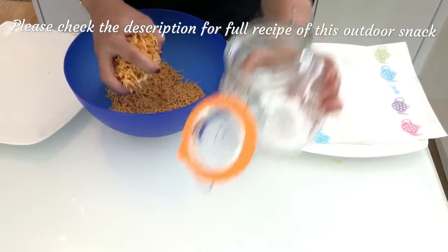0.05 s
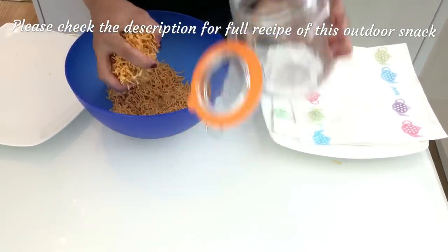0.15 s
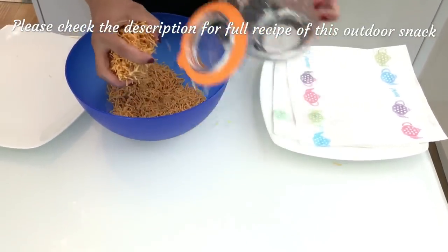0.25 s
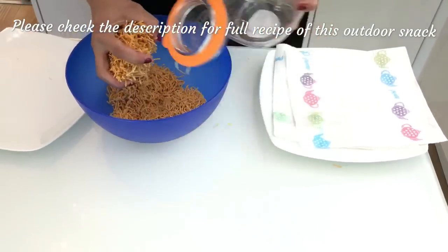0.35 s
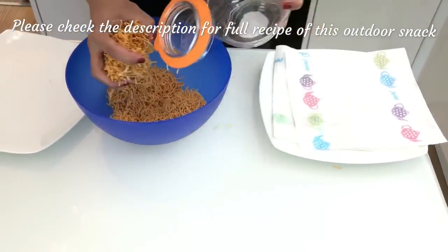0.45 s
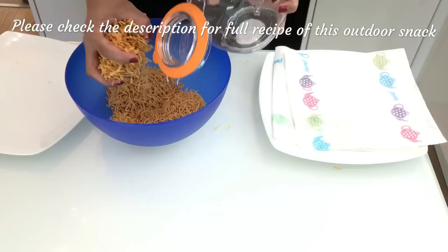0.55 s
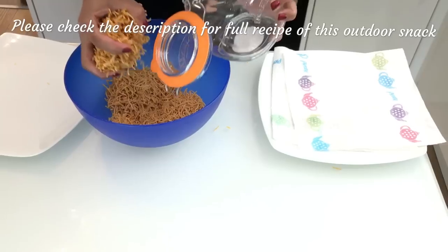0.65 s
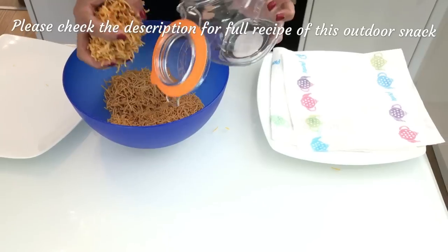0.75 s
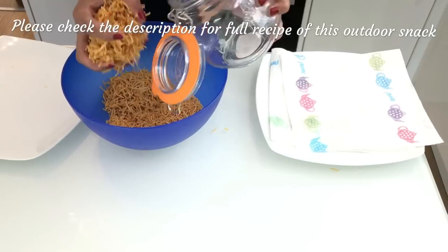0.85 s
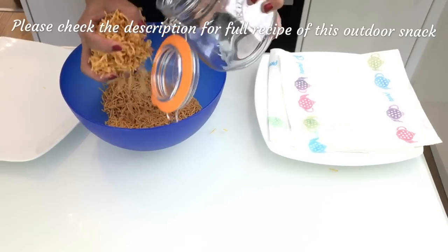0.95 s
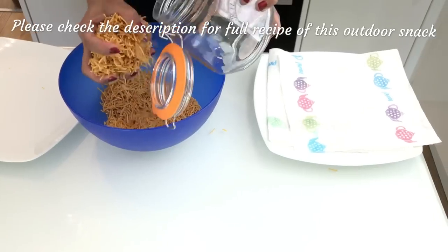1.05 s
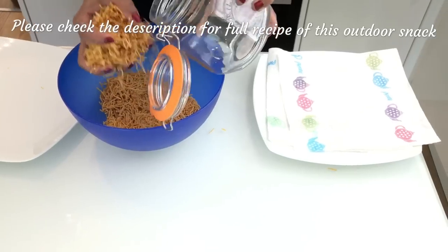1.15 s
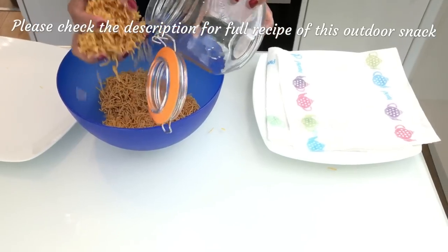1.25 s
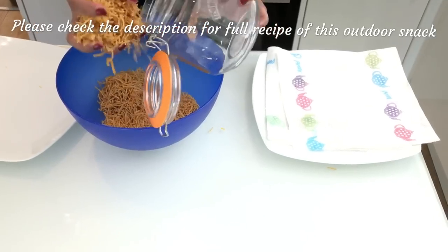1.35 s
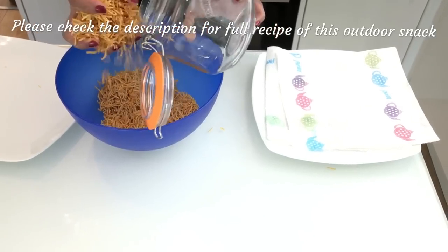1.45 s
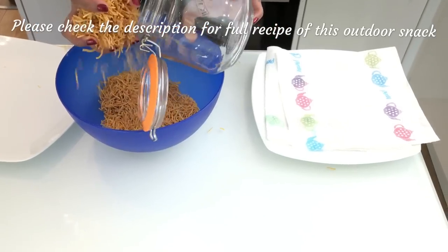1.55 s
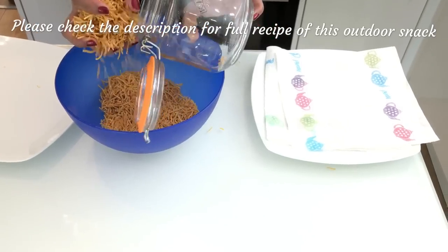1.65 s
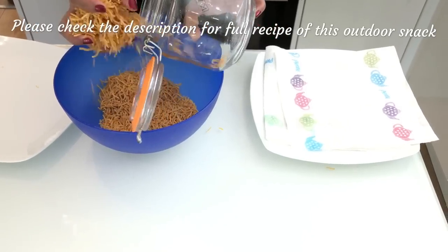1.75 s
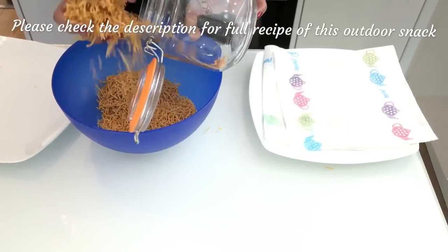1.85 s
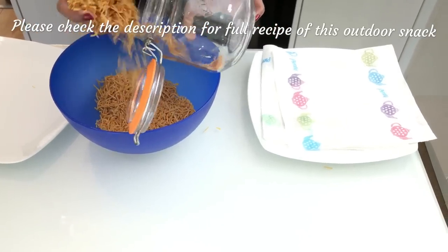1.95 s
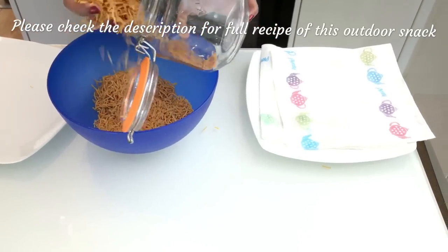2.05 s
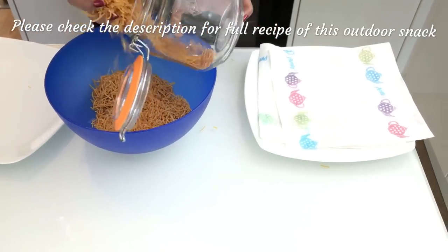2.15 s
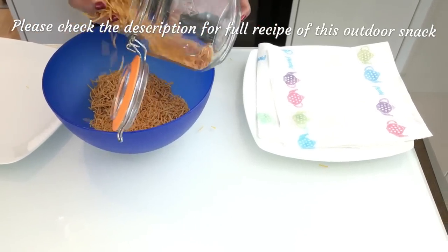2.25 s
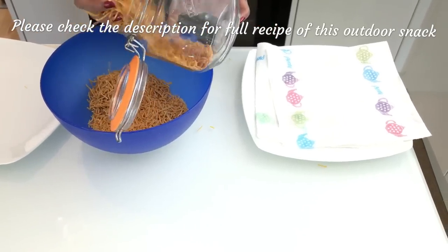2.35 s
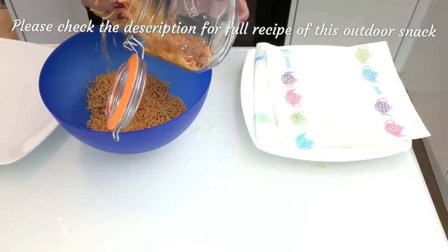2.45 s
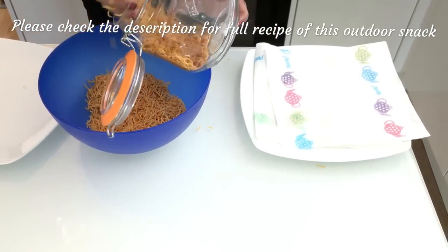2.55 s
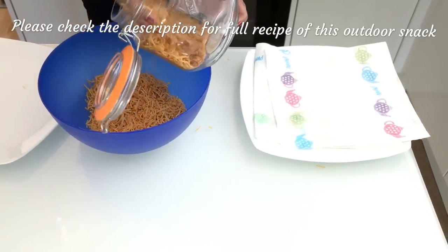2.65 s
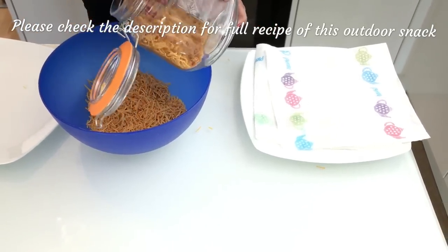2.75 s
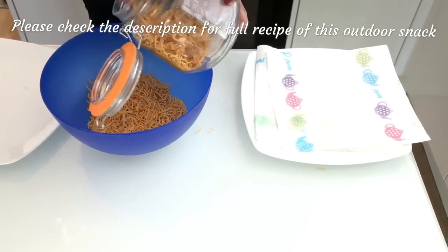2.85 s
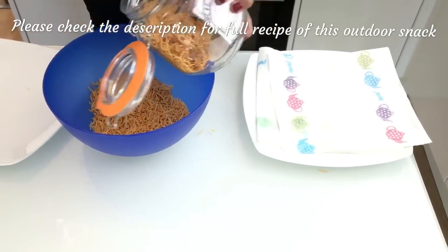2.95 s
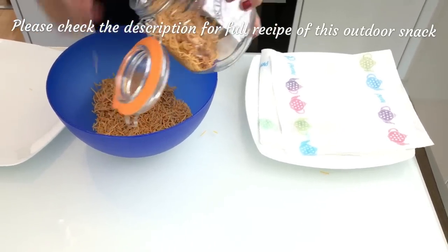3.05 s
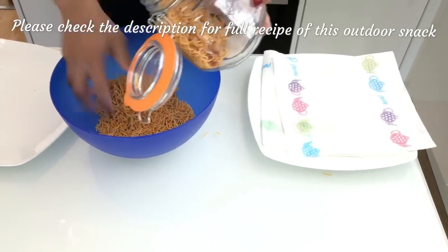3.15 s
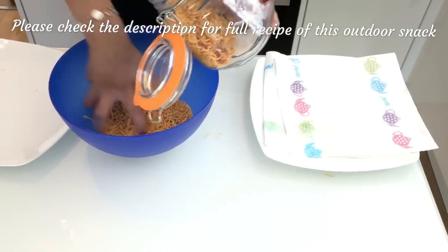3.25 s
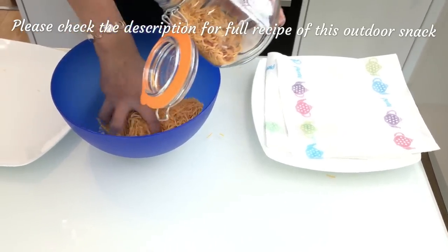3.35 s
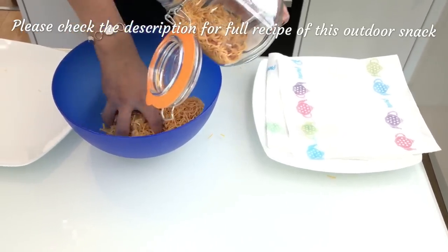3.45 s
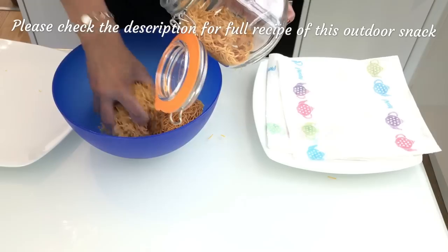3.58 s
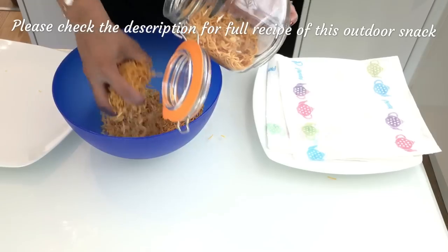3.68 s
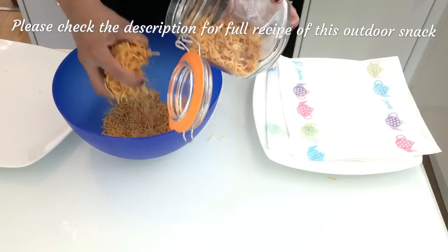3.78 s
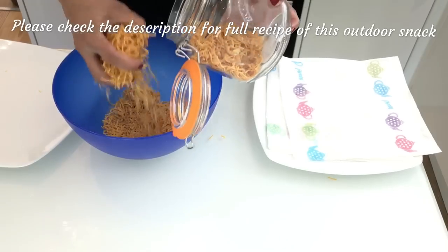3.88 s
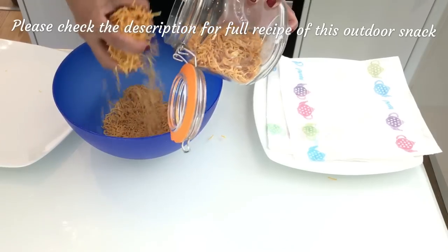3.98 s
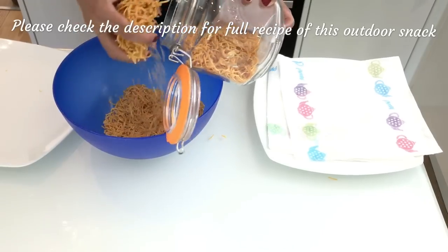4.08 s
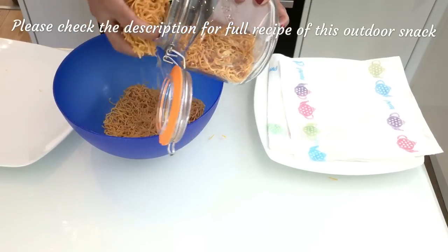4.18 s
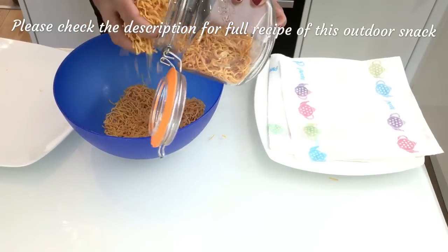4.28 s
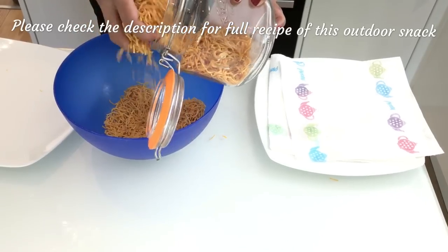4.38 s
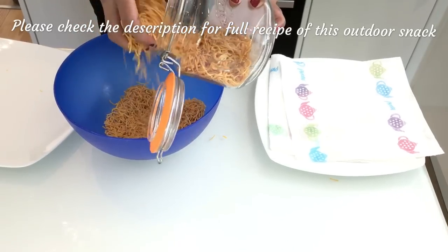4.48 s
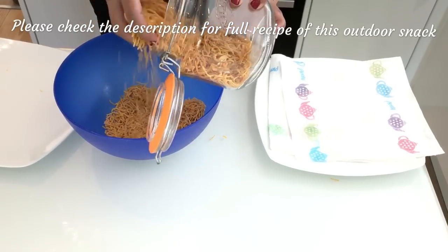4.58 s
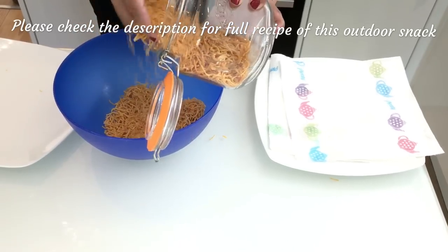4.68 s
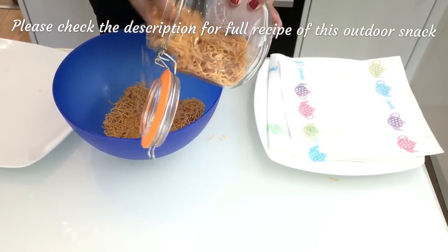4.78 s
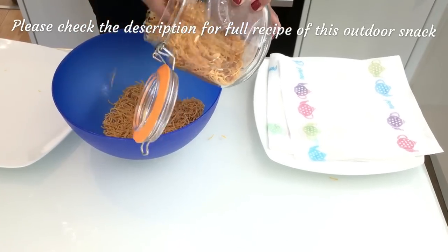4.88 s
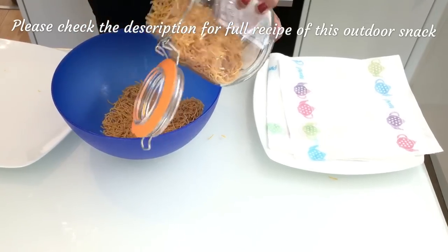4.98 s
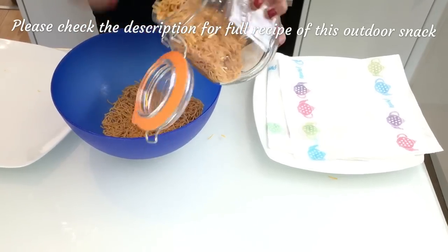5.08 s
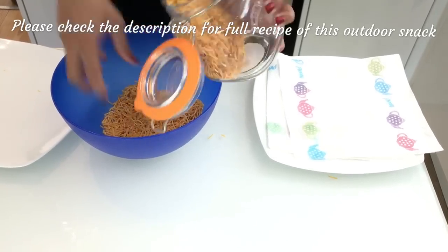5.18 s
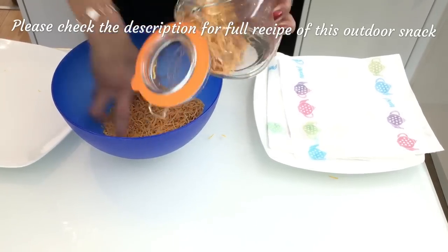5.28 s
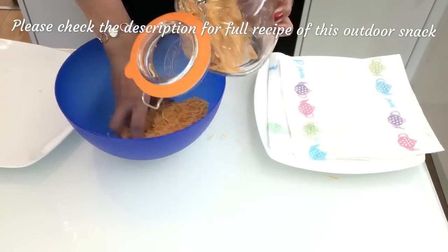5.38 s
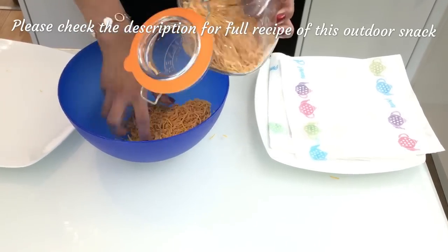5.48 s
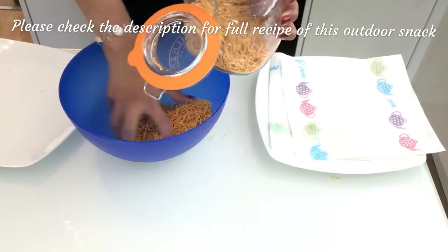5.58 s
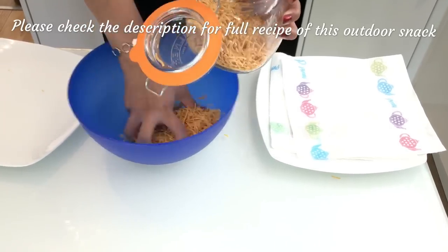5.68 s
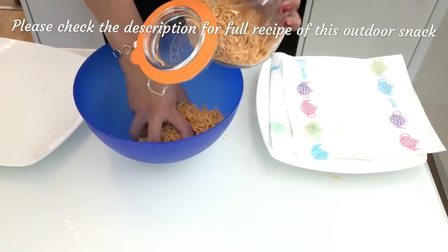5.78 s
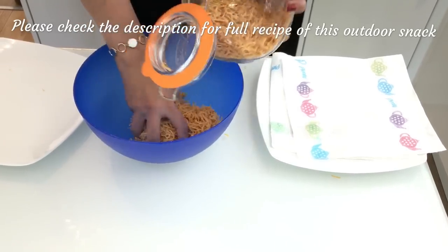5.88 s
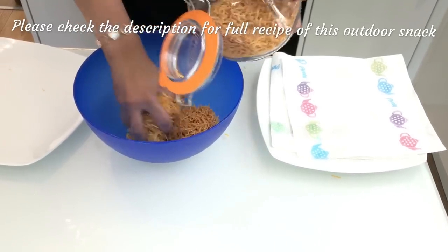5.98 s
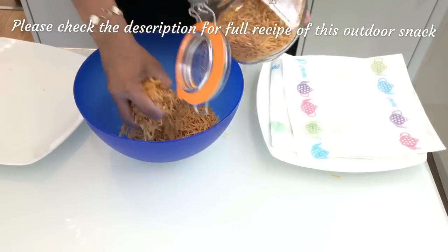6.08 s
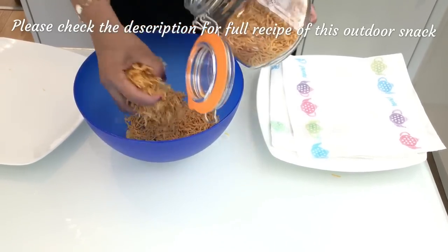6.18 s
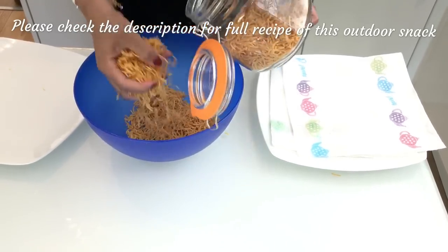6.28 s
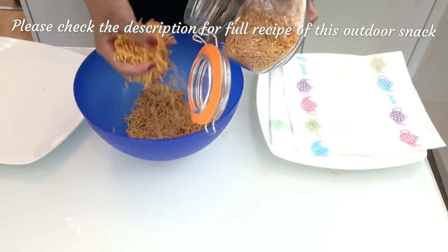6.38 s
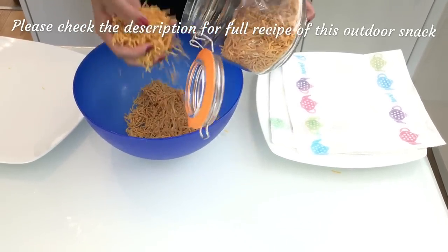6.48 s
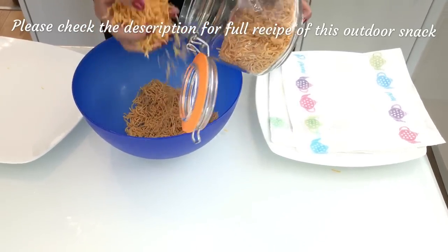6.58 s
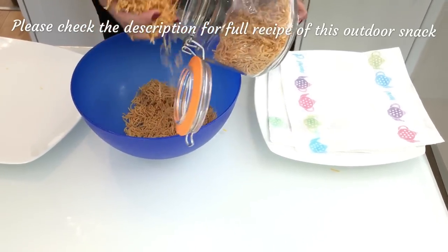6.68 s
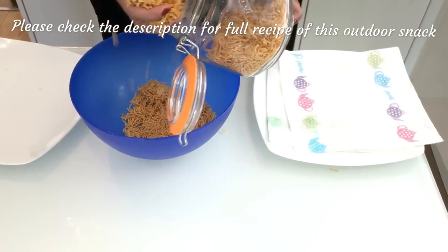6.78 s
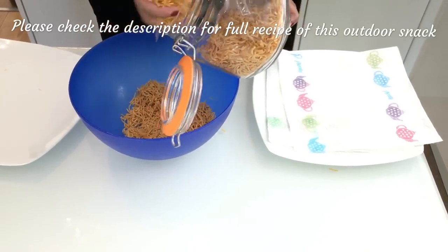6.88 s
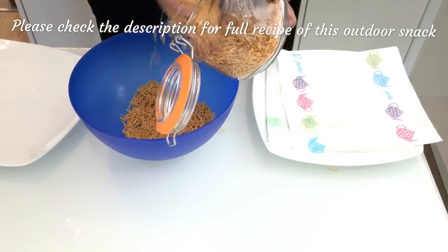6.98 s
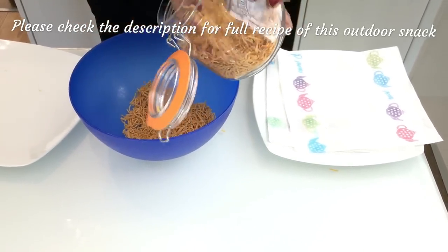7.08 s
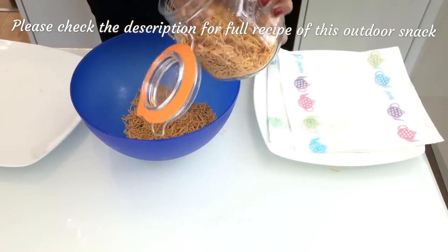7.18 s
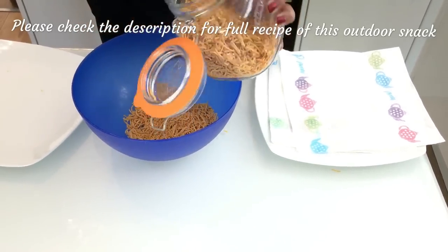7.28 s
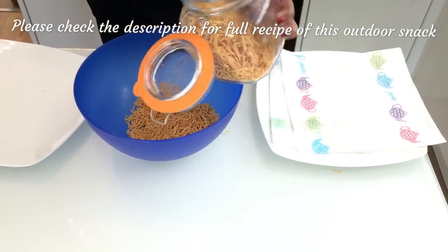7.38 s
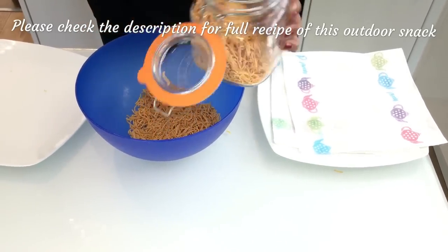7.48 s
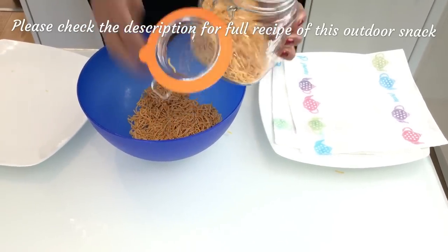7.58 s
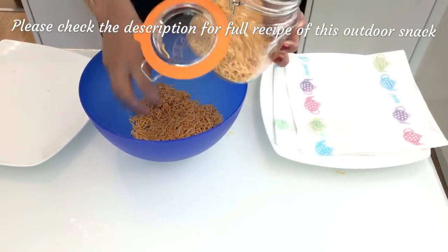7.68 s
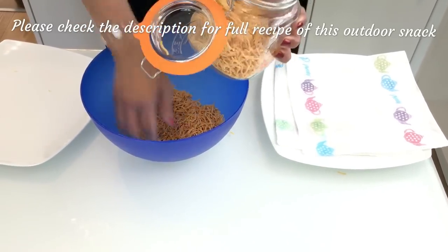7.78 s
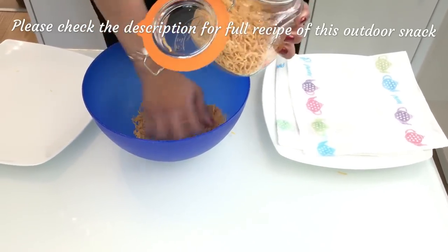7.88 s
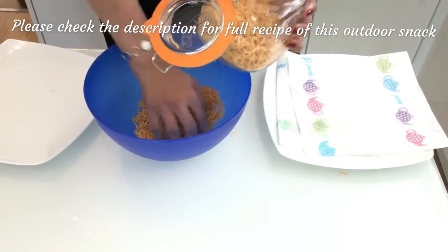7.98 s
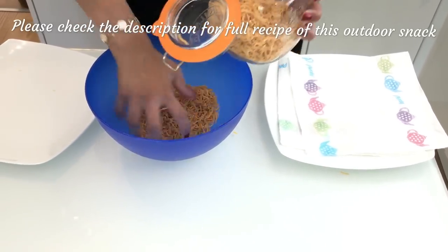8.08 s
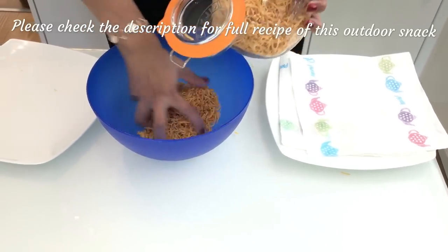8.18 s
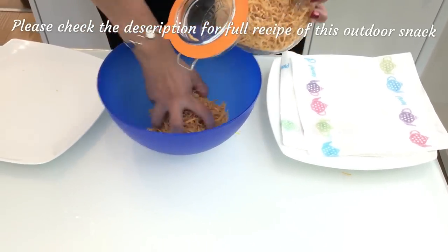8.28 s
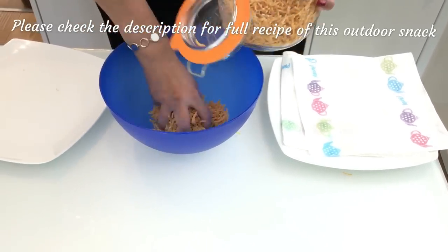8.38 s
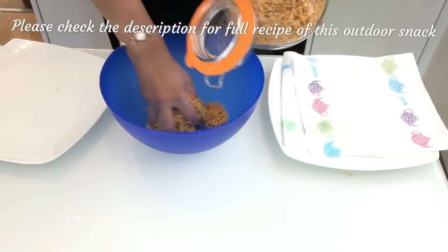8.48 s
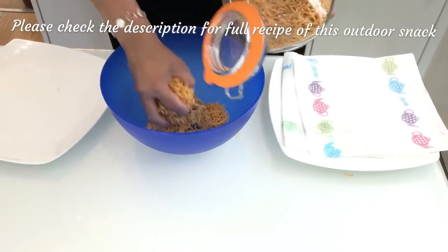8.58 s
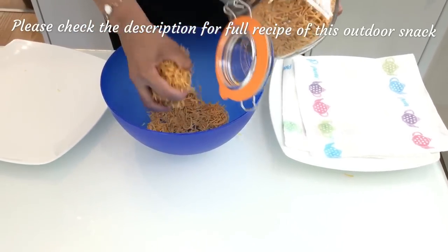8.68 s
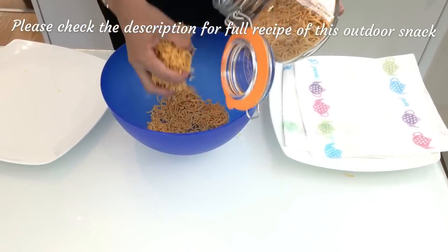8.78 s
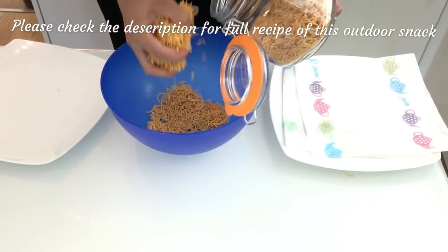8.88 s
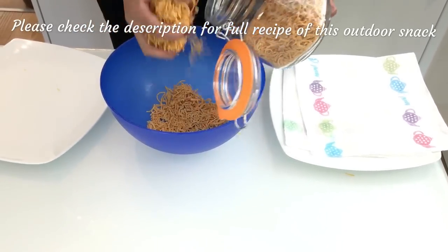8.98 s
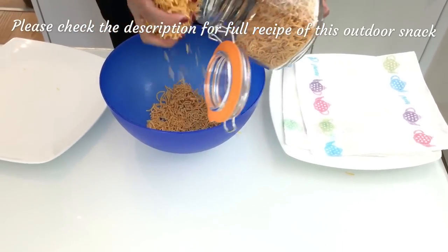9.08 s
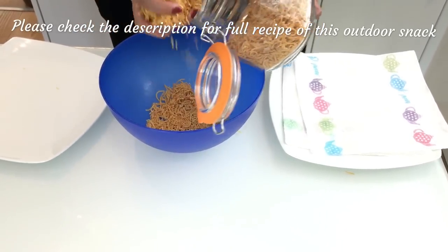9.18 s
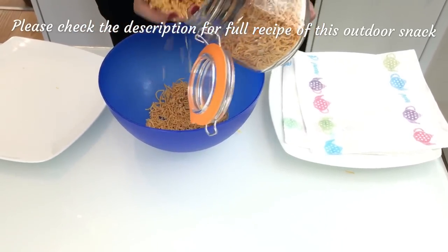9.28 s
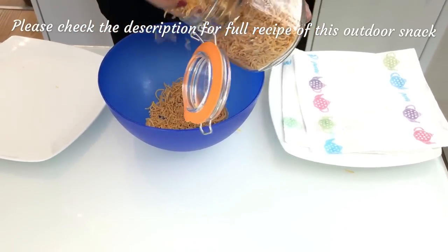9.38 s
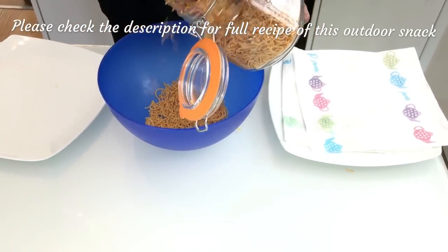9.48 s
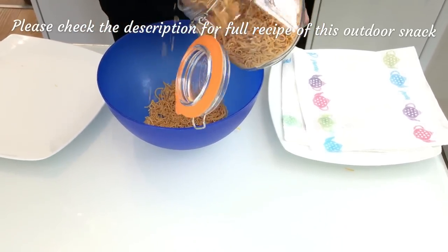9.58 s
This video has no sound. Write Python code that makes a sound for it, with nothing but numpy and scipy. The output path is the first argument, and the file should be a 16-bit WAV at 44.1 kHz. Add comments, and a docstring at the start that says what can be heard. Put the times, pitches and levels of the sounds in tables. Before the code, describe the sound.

Close and dry: light crackling of crisp strands, then a burst of hard snaps and glassy skittering. Three rounds of scooping from a plastic bowl follow, a swelling deep crunch with hollow knocks, then crackly trickling and ticking into a jar. The jar shifts with a dull ring before the last scoop. A fridge hums faintly in the small reflective kitchen.

```python
"""In a small hard kitchen a fridge hums steadily; one microphone stands close, and both channels carry it.
From the start brittle fried strands fall from a hand: random cracks rustle and drum on a plastic bowl.
Larger pieces soon snap, as struck resonances with splinters, and strands make a glass jar's modes tinkle.
Then come knocks on the bowl, and digs into the heap that swell the rustle with a deep crunch.
Near 7.7 s the jar shifts with a broader, duller ring; its last slide rings bright. The room adds a short tail."""
import sys
import numpy as np
from scipy import signal
from scipy.fft import rfft, irfft
from scipy.io import wavfile
from scipy.ndimage import uniform_filter1d

SR = 44100
rng = np.random.default_rng(int(sys.argv[2]) if len(sys.argv) > 2 else 0)


def bounce(signal):
    """Save signal as a 16-bit WAV file at the path given by the first command-line argument."""
    frames = np.transpose(np.atleast_2d(signal))
    limited = np.clip(frames, -1, 1)
    pcm = np.round(limited * 32767).astype(np.int16)
    wavfile.write(sys.argv[1], SR, pcm)


N = 425124
T = np.arange(N) / SR  # seconds

# Resonances of the plastic bowl: (frequency [Hz], width [Hz], level [dB])
BOWL_MODES = [(161, 16, -4), (241, 59, -10.5), (348, 28, 1.5), (517, 32, -7), (591.7, 39, 6.5),
              (656, 18, -1), (740, 30, -2.5), (1080, 200, -13.5)]


def undb(db):
    """Decibels to gain."""
    return 10 ** (np.asarray(db) / 20)


def unit(x):
    """Scale to rms 1."""
    return x / np.sqrt(np.mean(x ** 2))


def peaked(x, db):
    """Scale so that the highest peak has this level."""
    return x * undb(db) / np.max(np.abs(x))


def level_curve(points):
    """Gain along straight lines between (time [s], level [dB]) points; -120 dB outside them."""
    return undb(np.interp(T, *np.transpose(points), left=-120, right=-120))


def wander(size):
    """Slow chance, smoothed twice over this many samples; rms 1."""
    smooth = uniform_filter1d(rng.standard_normal(N), size=size)
    return unit(uniform_filter1d(smooth, size=size))


def band(x, lo_hz, hi_hz):
    """Band-pass."""
    return signal.sosfilt(signal.butter(2, [lo_hz, hi_hz], "band", fs=SR, output="sos"), x)


def ring(x, hz, width):
    """One resonance, gain 1 at its centre."""
    return signal.lfilter(*signal.iirpeak(hz, hz / width, fs=SR), x)


def body(x, modes):
    """A struck object: the sum of its resonances, neighbours in opposite phase."""
    return sum((-1) ** k * undb(db) * ring(x, hz, width) for k, (hz, width, db) in enumerate(modes))


def colour(x, points):
    """Causal filter with the given spectrum, built from the cepstrum of the log gain."""
    hz, db = np.transpose(points)
    grid_hz = np.linspace(1, SR / 2, num=2049)
    log_gain = np.interp(np.log(grid_hz), np.log(hz), db) * np.log(10) / 20
    cepstrum = irfft(log_gain)
    # Folding the second half onto the first gives minimum phase.
    cepstrum[1:2048] *= 2
    cepstrum[2049:] = 0
    return signal.oaconvolve(x, irfft(np.exp(rfft(cepstrum))))[:N]


def cracks(rate, spread_db, length_s):
    """Random short crackles, rate a second, many small and few large; mean power about 1 at any rate."""
    share = np.clip(rate / SR, 0, 1)
    chance = rng.random((2, N))
    size = undb(spread_db * np.minimum(-np.log(1 - chance[1]), 4))
    power = (chance[0] < share) * size ** 2 / (share * np.mean(size ** 2))
    fade = np.exp(-1 / (length_s * SR))
    envelope = np.sqrt(signal.lfilter([1 - fade], [1, -fade], power))
    return envelope * rng.standard_normal(N)


def blows(count, length_s, splinters):
    """Sudden pushes that fray into uneven noise, one row each."""
    t = np.arange(SR // 8) / SR
    noise = rng.standard_normal((count, 2, len(t)))
    noise[:, 0, 0] = 3  # every push starts with a firm edge
    uneven = uniform_filter1d(noise[:, 1], size=150, axis=1) ** 2 * 150
    return noise[:, 0] * (np.exp(-t / length_s) + splinters * uneven * np.exp(-t / 0.018))


def kitchen():
    """Fridge tones, sines that waver together in level, over quiet room noise."""
    # Fridge tones before the waver: (frequency [Hz], level [dB])
    fridge_tones = [(100.2, -61.5), (114.4, -71), (44.1, -73.5)]
    # Shape of the room noise: (frequency [Hz], relative density [dB per Hz])
    air_shape = [(30, -49), (50, -14), (140, -19.5), (260, -15.5), (400, -19), (650, -21), (1300, -27),
                 (4000, -32.5), (15000, -39)]
    air_db, waver_db = -63.5, 1.3
    hum = sum(np.sqrt(2) * undb(db) * np.sin(2 * np.pi * hz * T) for hz, db in fridge_tones)
    hum *= undb(waver_db * wander(size=4000))
    return hum + undb(air_db) * unit(colour(rng.standard_normal(N), air_shape))


def falling_power():
    """Power of the rustle and of the crisp edge as strands fall from the hand."""
    # One list for each stretch of falling strands:
    # (time [s], rustle level [dB], crisp edge against the rustle [dB])
    stretches = [
        [(0.0, -55.5, -9), (0.364, -64, -2), (0.678, -53, -7), (0.854, -59.5, -4), (1.05, -63.5, 6)],
        [(1.06, -54, -3), (1.12, -58.5, 3), (1.26, -48.5, -5), (1.46, -53.5, -1.5), (1.66, -49.5, -2),
         (1.79, -51, -0.5), (2.1, -51, 3.5), (2.38, -53, -5.5), (2.74, -61.5, 4.5), (2.95, -70, 0),
         (3.1, -99, -13)],
        [(3.45, -38, -11), (3.866, -46, -8), (4.14, -46.5, -5), (4.284, -49, -3), (4.36, -58.5, 0),
         (4.444, -53.5, 5.5), (4.58, -54.5, 5), (4.614, -44.5, -2), (4.752, -44.5, -10), (4.856, -47, -2.5),
         (5.068, -57, -7), (5.3, -71, 5)],
        [(5.5, -48.5, 0), (5.576, -49, -10), (5.71, -46.5, -23), (5.836, -44, -15), (5.938, -41.5, -8.5),
         (6.51, -51, -4.5), (6.852, -48, -1.5), (7.086, -54, -1.5), (7.226, -60.5, 2.5), (7.45, -73, -21)],
        [(7.5, -69, -3), (7.672, -72, 7), (7.78, -80, -12), (7.95, -60, -12)],
        [(8.15, -46, -17), (8.394, -44, -9), (8.668, -40.5, -13.5), (8.872, -48.5, -27), (9.12, -58, 1),
         (9.27, -45, -12.5), (9.64, -55.5, -0.5)],
    ]
    fall, crisp = np.zeros(N), np.zeros(N)
    for s, db, edge_db in map(np.transpose, stretches):
        gain = level_curve(list(zip(s, db)))
        fall += gain ** 2
        crisp += (gain * undb(np.interp(T, s, edge_db))) ** 2
    return fall, crisp


def heap():
    """Strands crack against each other, the more the harder they are stirred; thick ones crack lower."""
    # Shape of the rustle: (frequency [Hz], relative density [dB per Hz])
    rustle_shape = [(410, -21), (700, -21), (816, -31), (1180, -2.5), (1520, -4), (1720, 4), (2170, 7),
                    (2950, 1), (5380, -3), (8000, -5.5), (10400, -6), (17600, -120)]
    # Shape of the crisp edge: (frequency [Hz], relative density [dB per Hz])
    edge_shape = [(2940, 7.5), (5000, -83), (5380, -48), (7750, 4.5), (8710, 11), (10300, 7), (14200, 10.5),
                  (16000, 2.5)]
    # Loose strands of three sizes: pitch [Hz]
    strand_pitches = [1700, 2300, 2800]
    fall_drum_db, fall_deep_db, tick_db = -9.5, -17.5, -10.5  # against the rustle of falling strands
    dig_edge_db = -8.5  # against the rustle of a dig
    thud_db = -16  # against the deep crunch
    deep_lag_s = 0.024  # the fingers reach the bottom after the loudest rustle
    light_hz = 396  # falling strands are too light to move the bowl below this
    bowl_wander_db = 2  # each mode swells and fades alone as the strands move

    fall, crisp = falling_power()
    dig, deep = dig_power(), dig_power(deep_lag_s, deep=1)
    rustle = np.sqrt(dig + fall)
    rate = 150 + 200 * (rustle / undb(-54.5)) ** 1.1  # cracks a second
    thick, middle, thin, fine = (cracks(rate, spread_db=6.5, length_s=0.0035) for _ in range(4))

    sizes = sum(ring(cracks(rate / 3, spread_db=3.5, length_s=0.0025), hz, 510) for hz in strand_pitches)
    tinted = 0.79 * sizes + ring(thin, 3800, 5700) + ring(fine, 6130, 4500)
    tinted += 0.063 * (thick + middle + thin)
    out = rustle * unit(colour(tinted, rustle_shape))

    # The same cracks drum on the bowl.
    drum = sum(undb(bowl_wander_db * wander(size=2500)) * body(thick + middle, [mode])
               for mode in BOWL_MODES)
    light_drum = band(band(drum, light_hz, 3700), light_hz, 3700)
    out += np.sqrt(dig_power(on_bowl=1)) * unit(drum)
    out += np.sqrt(fall) * undb(fall_drum_db) * unit(light_drum)

    crunch = np.sqrt(deep + fall * undb(2 * fall_deep_db))
    out += crunch * unit(band(thick, 847, 1287))
    # The pressed bowl thuds on the counter.
    out += np.sqrt(deep) * undb(thud_db) * unit(ring(thick, 130, 59))

    # Lone falling pieces tick.
    ticks = cracks(np.full(N, 70.), spread_db=4, length_s=0.0008)
    tick_sound = ring(ticks, 2500, 980) + 0.91 * band(ticks, 6900, 22000)
    out += np.sqrt(fall) * undb(tick_db) * unit(tick_sound)

    dust = 0.86 * rng.standard_normal(N)  # crumbs too small to tell apart
    edge = np.sqrt(dig * undb(2 * dig_edge_db) + crisp)
    return out + edge * unit(colour(thin + fine + dust, edge_shape))


def snaps():
    """Each larger piece rings briefly on its own pitch under a bright click and scatters splinters."""
    # Single snaps before trims: (time [s], peak level [dB], pitch [Hz], brightness against the peak [dB])
    pieces = [(0.1206, -39, 2450, -13), (0.173, -37.5, 2380, -6.5), (0.348, -32.5, 2400, -10),
              (0.4327, -37, 2300, -12), (0.5895, -47, 2030, 3), (0.606, -29.5, 2400, -8),
              (0.6894, -30, 2680, -9.5), (0.7037, -31, 2380, -18), (1.0797, -32, 2520, -13),
              (1.1174, -30.5, 2400, -16), (1.1492, -29, 1680, -17), (1.1983, -28, 2560, -15),
              (1.2481, -37, 2430, -15), (1.2785, -20.5, 2340, -23), (1.2856, -14, 2350, -17),
              (1.3268, -14, 2400, -10.5), (1.3774, -28, 2160, -11), (1.399, -29, 2570, -7),
              (1.6265, -6.5, 2480, -23), (1.6881, -22.5, 2490, -5.5), (1.732, -26, 2540, -7),
              (1.803, -36.5, 2500, -10), (1.8314, -20, 2600, -8.5), (1.88, -26.5, 2400, -12),
              (2.0057, -25, 2430, -1.5), (2.029, -27, 6000, -12), (2.0383, -19, 2520, -7.5),
              (2.043, -24.5, 2450, -9), (2.209, -25.5, 2360, -12), (2.219, -34, 7500, -6),
              (2.2384, -24, 2440, -9), (2.267, -26.5, 2440, -6), (2.4187, -20.5, 2400, -12),
              (2.722, -32, 2550, -18), (2.7342, -21, 2200, -15), (3.195, -31, 2700, -15),
              (3.2259, -23, 2150, -8), (3.253, -19, 2310, -8), (3.2974, -22.5, 1700, -22),
              (3.7298, -22, 2450, -9.5), (3.8221, -23.5, 2380, -12), (3.907, -37, 2330, -17),
              (3.9415, -40, 2030, -13), (3.9559, -30, 2110, -27), (4.0023, -23.5, 2040, -11),
              (4.0457, -43, 2310, -18), (4.0693, -27.5, 2180, 0), (4.0991, -21.5, 2280, -14),
              (4.153, -30, 2500, -8), (4.1722, -27, 2550, -8), (4.2153, -30, 2300, -18),
              (4.234, -28.5, 2130, -11), (4.2741, -30.5, 3020, -4), (4.514, -30.5, 2300, -5),
              (4.601, -31, 2320, -6), (4.613, -18, 2260, -14), (4.6263, -28, 2330, -7.5),
              (4.668, -23, 2100, -7), (4.675, -25, 2450, -19), (4.737, -34, 1810, -15),
              (4.7631, -27, 2310, -33), (4.8367, -31, 1760, -7), (4.8555, -32.5, 2950, -4),
              (4.8927, -23, 2180, -12), (5.01, -25, 2100, -4), (5.029, -25, 2560, -12),
              (5.329, -25.5, 2330, -17), (5.351, -20.5, 2340, -19), (5.5873, -34.5, 4460, -5),
              (5.6067, -28.5, 2420, -22), (5.6988, -20.5, 1800, -17), (6.098, -33, 2310, -21),
              (6.1313, -20.5, 2410, -20), (6.2029, -13.5, 2390, -22), (6.283, -24, 2650, -12),
              (6.3395, -29, 2260, -6), (6.3688, -29.5, 2600, -7), (6.4362, -32, 2010, -16),
              (6.4507, -24, 2510, -12), (6.4857, -26, 2360, -16), (6.5313, -32.5, 2520, -6),
              (6.59, -27.5, 2330, -27), (6.6093, -28, 2520, -20), (6.633, -25, 2300, -21),
              (6.647, -19.5, 2880, -9.5), (6.6814, -29, 2380, 1), (6.699, -12, 2480, -19),
              (6.729, -32, 2260, -6), (6.772, -25.5, 3500, -9), (6.795, -25, 2440, -26),
              (6.8207, -28, 2720, -3), (6.841, -33, 2490, 1), (6.8698, -27, 2480, -6),
              (6.919, -23.5, 4630, -17), (6.945, -20, 2460, -12), (6.991, -18.5, 2200, -11),
              (7.0898, -27, 2370, -29), (7.202, -35, 1900, -8), (7.8395, -25.5, 2260, -30),
              (7.8514, -29, 2430, -27), (7.8829, -29.5, 2510, -25), (8.1749, -14.5, 2430, -16),
              (8.269, -22, 1740, -28), (8.3166, -17, 1870, -13), (8.351, -15, 1680, -14),
              (8.5903, -24, 2400, -23), (8.6108, -16.5, 2280, -17), (8.7081, -25, 2330, -16),
              (8.726, -20.5, 2480, -5.5), (8.734, -24.5, 2330, -10), (8.7952, -26.5, 3520, -11),
              (8.8199, -24, 2220, -15), (9.031, -39.5, 5000, 1), (9.0702, -32, 1890, -20),
              (9.074, -34, 2190, -14), (9.0959, -27, 2530, -2), (9.1176, -26, 2010, -24),
              (9.1739, -24.5, 2130, -22), (9.192, -29, 1200, -19), (9.239, -21, 2600, -3.5),
              (9.2508, -27, 2560, -18), (9.2755, -31, 2350, -5), (9.3154, -29, 2340, -21),
              (9.355, -30, 1800, -16), (9.4153, -22, 2300, -13.5), (9.4378, -26.5, 2160, -2.5),
              (9.5768, -29.5, 2330, -5)]
    sharp_db, crisp_db = 5.5, 10  # upper middle and top, against the brightness
    base_width_hz, base_hz = 650, 2460  # pieces pitched above base_hz ring much more briefly
    out = np.zeros(N + SR)
    for (s, db, hz, bright_db), push in zip(pieces, blows(len(pieces), 0.00098, 0.16)):
        width = min(base_width_hz * max(hz / base_hz, 1) ** 2, hz)
        pitched = ring(ring(push, hz, width), hz, width)
        sound = peaked(pitched + 0.45 * band(push, 1960, 4130), db - 0.5)
        sound += peaked(band(push, 3400, 6620), db + bright_db + sharp_db)
        sound += peaked(band(push, 14000, 22000), db + bright_db + crisp_db)
        out[int(s * SR):][:len(push)] += sound
    return out[:N]


def jar():
    """Strands skitter over the glass and keep its modes ringing, each in its own time."""
    # Strands sliding on glass, a list a slide, before the trim: (time [s], level [dB])
    slides = [
        [(0.622, -75), (0.632, -45.5), (0.665, -56), (0.7, -66)],
        [(1.95, -76), (2.12, -57), (2.27, -47), (2.38, -53), (2.47, -48.5), (2.676, -56), (2.81, -48),
         (2.9, -62), (2.98, -78), (3.05, -96)],
        [(4.93, -68), (5.06, -52), (5.135, -61), (5.18, -57.5), (5.27, -59.5), (5.33, -55)],
        [(6.9, -75), (6.99, -52), (7.2, -62.5), (7.31, -78)],
        [(7.53, -73), (7.622, -63), (7.634, -47), (7.66, -59), (7.68, -72)],
        [(9.45, -49.5), (9.622, -59), (9.64, -43)],
    ]
    # Resonances of the glass: (frequency [Hz], width [Hz], level [dB])
    glass_modes = [(2390, 99, -8), (3960, 80, -3.5), (4547, 58, 1.5), (6450, 200, -11), (7230, 200, -8.5),
                   (8420, 100, -6), (9800, 140, -15), (11600, 220, -17)]
    # Strands shifting in the nearly full jar, before the trim: (time [s], level [dB])
    shift = [(7.672, -66), (7.684, -50), (7.714, -49.5), (7.84, -59)]
    # Broader, duller resonances of that shift: (frequency [Hz], width [Hz], level [dB])
    shift_modes = [(3940, 240, 2), (6550, 800, -5), (7400, 300, -5), (8500, 550, -7), (12500, 2000, -11)]
    # Extra level of the glass modes above 8 kHz: (time [s], level [dB])
    shrill_points = [(2.6, 2.5), (2.72, -8), (7.3, -12), (7.6, 3.5)]
    glass_wander_db = 2  # each mode swells and fades alone as the strands move
    shrill = undb(np.interp(T, *np.transpose(shrill_points)))
    out = np.zeros(N)
    for spans, modes, trim_db in ((slides, glass_modes, 2), ([shift], shift_modes, 1.5)):
        slide = sum(level_curve(points) for points in spans)
        taps = cracks(np.full(N, 1200.), spread_db=1.5, length_s=0.0019)
        scale = undb(trim_db) / np.std(body(taps, modes))
        for mode in modes:
            touch = slide * undb(glass_wander_db * wander(size=2500))
            if modes is glass_modes and mode[0] > 8000:
                touch = touch * shrill
            out += scale * body(touch * taps, [mode])
    return out


def knocks():
    """Fingers and lumps knock on the bowl: its modes ring, with a hard rap and a low thud."""
    # Before trims: (time [s], peak level [dB], hard rap against the peak [dB], low thud against it [dB])
    hits = [(1.153, -34, 1.5, -5.5), (1.286, -42.5, -13, -27), (1.627, -40.5, -19, -18),
            (1.986, -42, 11.5, -0.5), (3.256, -38.5, -2, -3), (3.296, -35, 10, -12), (3.327, -32, -7, -13),
            (4.106, -43.5, 8, -9), (4.599, -39.5, 5, -29), (5.331, -38.5, -1, -12), (5.698, -42, 1, -6),
            (5.727, -30.5, -3, -22), (5.839, -45, 1, -2), (5.862, -44, 3, -13), (5.965, -45, 8, -24),
            (6.94, -47, 13.5, -17), (7.839, -40.5, -9, -4), (8.266, -41.5, 16, -23), (8.318, -35, -1, -13),
            (8.351, -30, 6.5, -16), (9.171, -56, 18, -10), (9.411, -56, 21, -11)]
    out = np.zeros(N + SR)
    for (s, db, hard_db, thud_db), push in zip(hits, blows(len(hits), 0.0012, 0.18)):
        sound = peaked(body(push, BOWL_MODES), db + 1.5)
        sound += peaked(band(push, 780, 1700), db + hard_db + 2)
        sound += peaked(band(push, 165, 354), db + thud_db + 2)
        out[int(s * SR):][:len(push)] += sound
    return out[:N]


def dig_power(lag_s=0, on_bowl=0, deep=0):
    """Power of fingers digging into the heap: each dig rises and falls as a lopsided bell."""
    # (loudest moment [s], rustle level [dB], rise [s], fall [s],
    #  drumming on the bowl against the level [dB], deep crunch against the level [dB])
    digs = [(3.366, -31, 0.065, .12, -9.5, -7.5), (5.41, -31.5, 0.05, 0.063, -10.5, -11.5),
            (5.70, -37, 0.055, 0.13, -8, -17.5), (5.838, -32.5, 0.076, 0.12, -11.5, -7),
            (8.002, -34.5, 0.092, 0.087, -11.5, -15.5), (8.354, -33.5, 0.12, 0.13, -9, -11.5)]
    out = np.zeros(N)
    for s, db, rise_s, fall_s, drum_db, deep_db in digs:
        t = T - s - lag_s
        bell = np.exp(-2 * (t / np.where(t < 0, rise_s, fall_s)) ** 2)
        out += undb(2 * (db + on_bowl * drum_db + deep * deep_db)) * bell
    return out


def room_tail(near):
    """The tail that tiles and counters return: decaying noise, its treble softened."""
    t60_s, tail_db = 0.39, -7.5
    t = np.arange(SR // 2) / SR
    tail = rng.standard_normal(len(t)) * 1000. ** (-t / t60_s) * (t > .002)
    tail = signal.lfilter([1], [1, -.4], tail)
    return undb(tail_db) * signal.oaconvolve(near, tail / np.sqrt(np.sum(tail ** 2)))[:N]


def scene():
    """All handling sounds close to the microphone, their room tail and the kitchen, alike in both channels."""
    near = heap() + snaps() + jar() + knocks()
    return np.tile(near + room_tail(near) + kitchen(), (2, 1))


def record(dry):
    """The recorder cuts the top steeply."""
    top_hz = 15900
    return signal.sosfilt(signal.ellip(12, .2, 100, top_hz, fs=SR, output="sos"), dry)


dry = scene()
out = record(dry)
bounce(out)
```